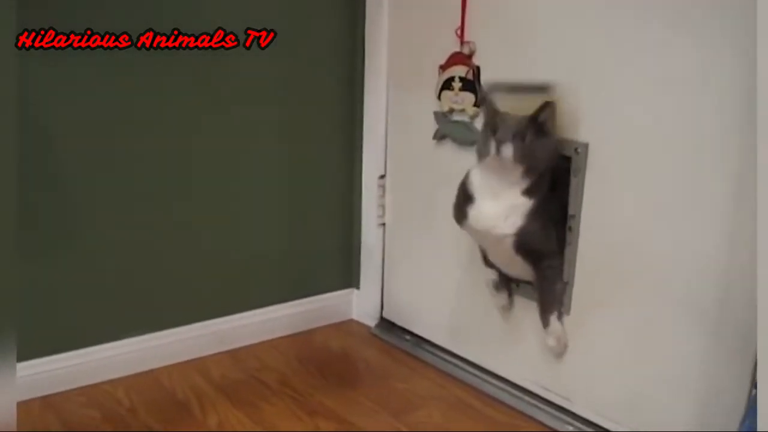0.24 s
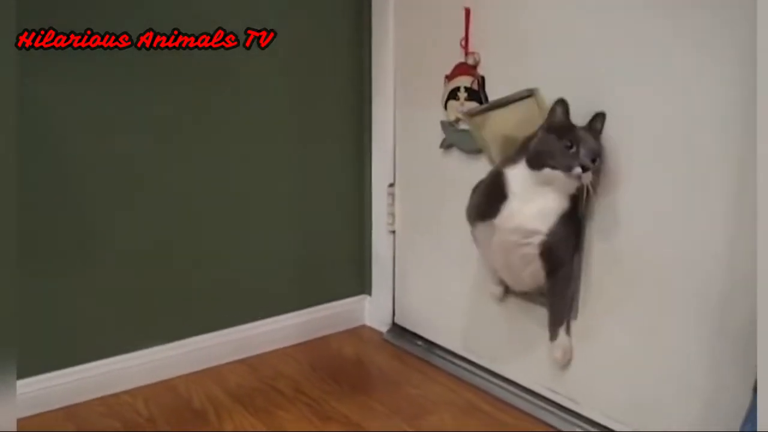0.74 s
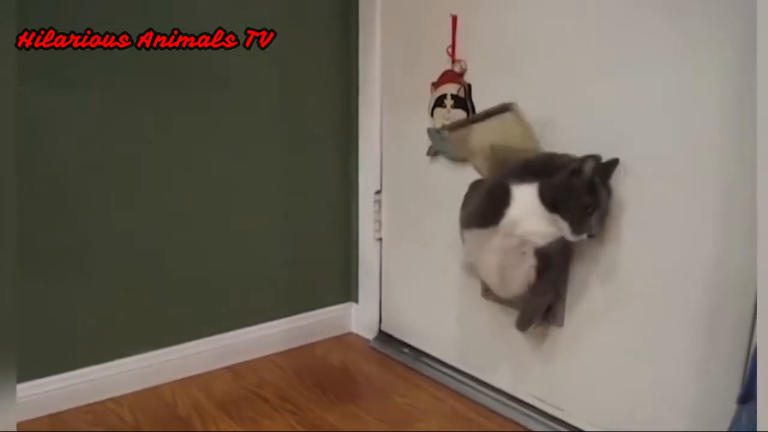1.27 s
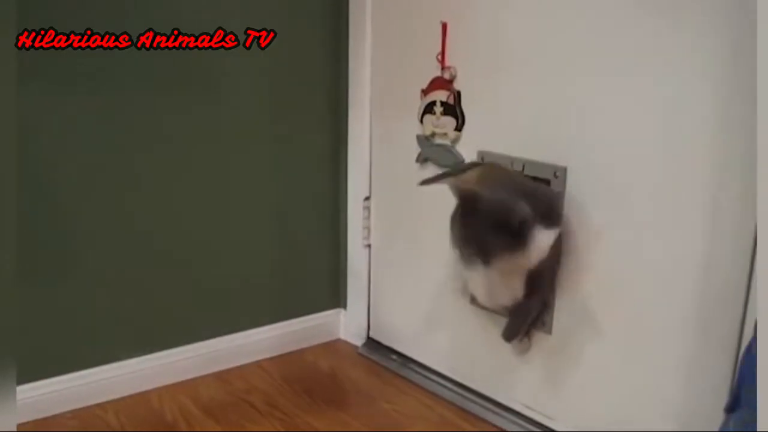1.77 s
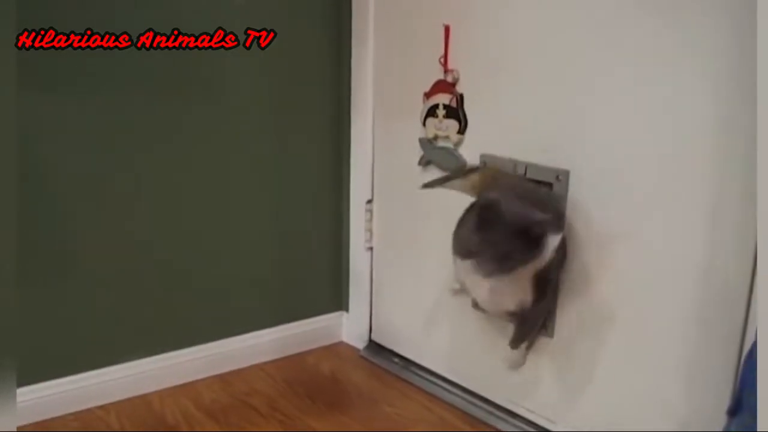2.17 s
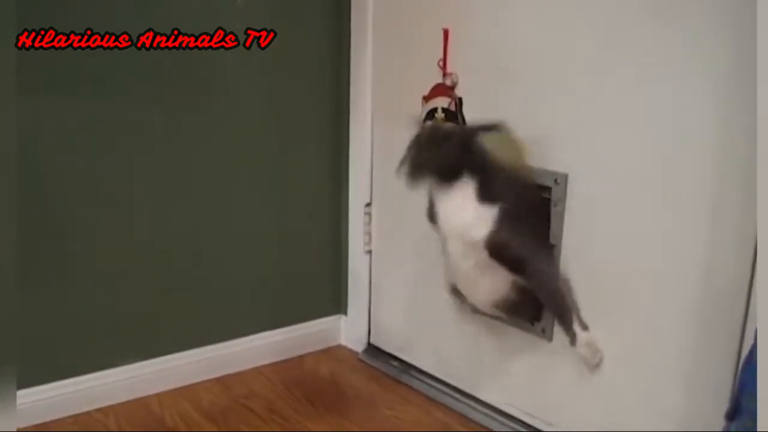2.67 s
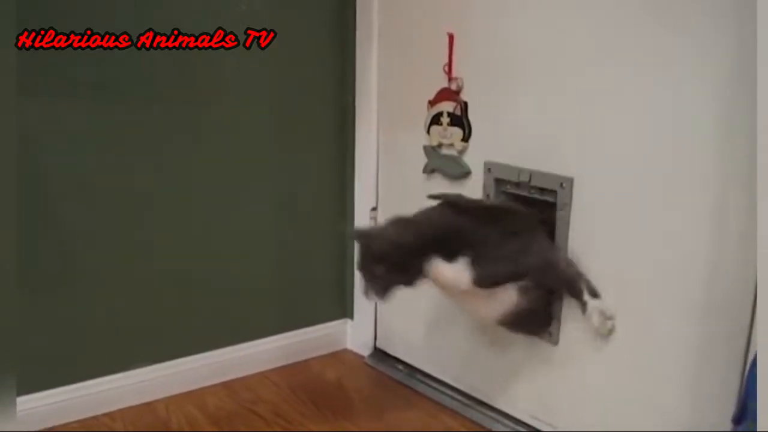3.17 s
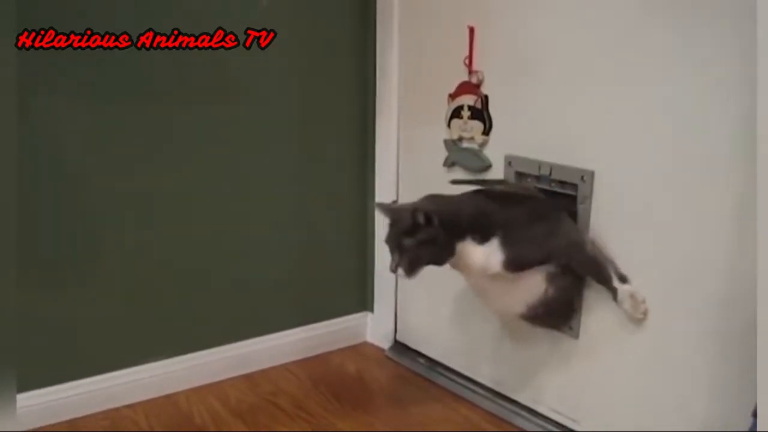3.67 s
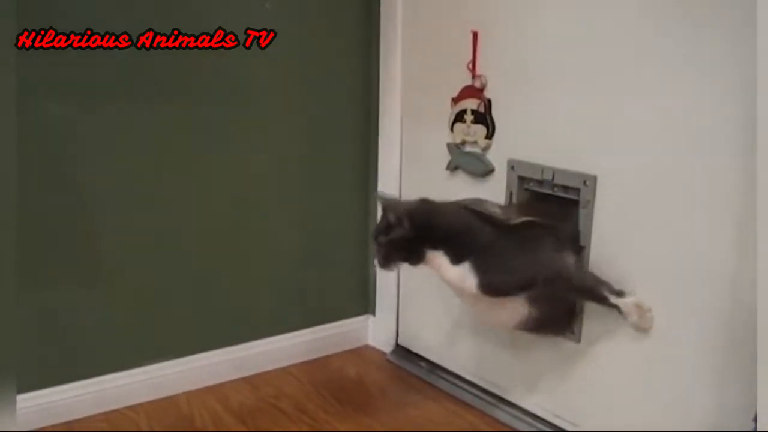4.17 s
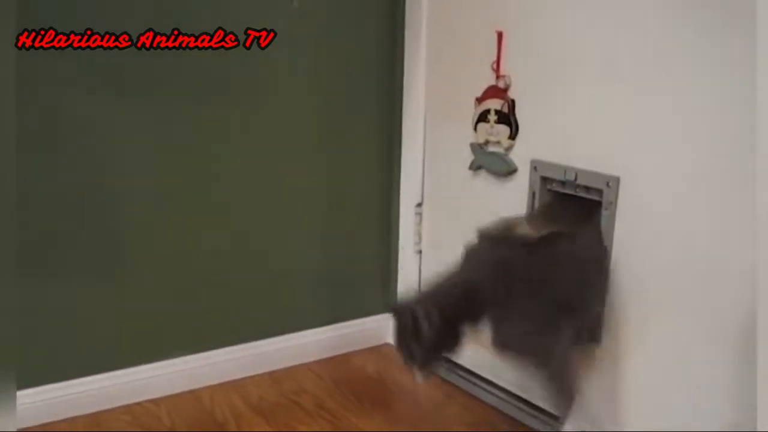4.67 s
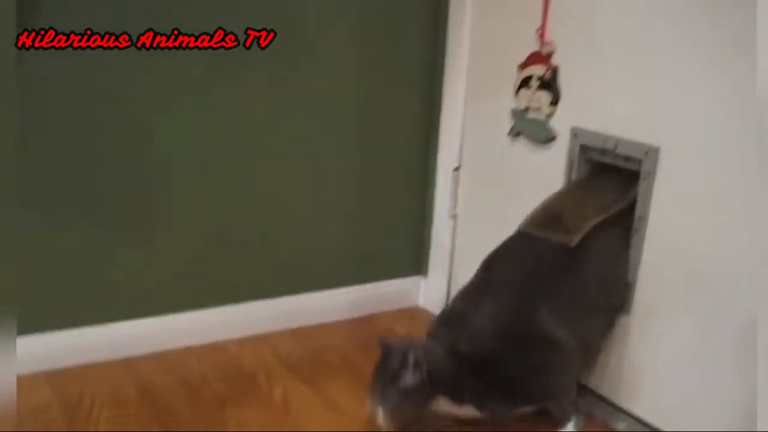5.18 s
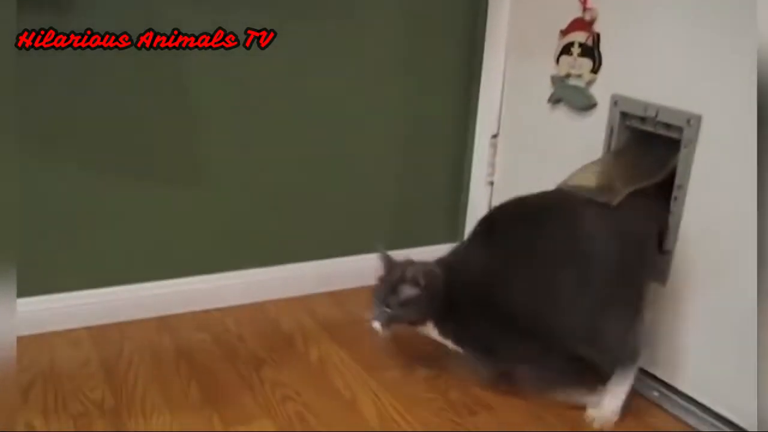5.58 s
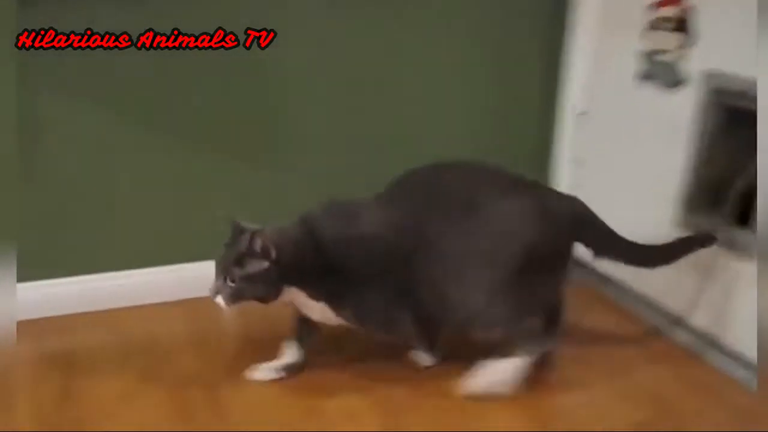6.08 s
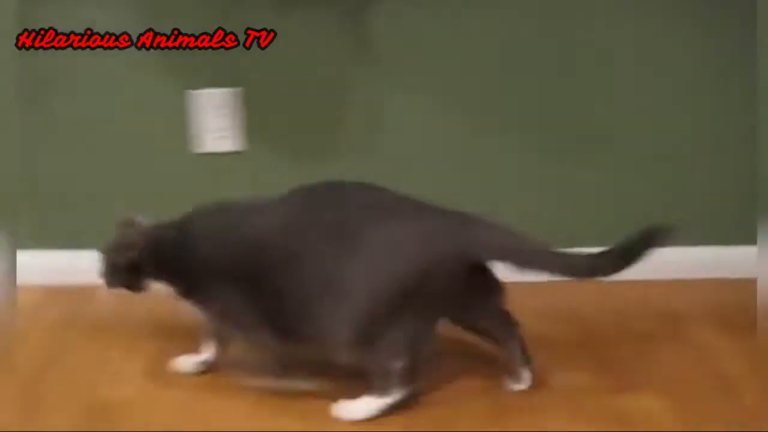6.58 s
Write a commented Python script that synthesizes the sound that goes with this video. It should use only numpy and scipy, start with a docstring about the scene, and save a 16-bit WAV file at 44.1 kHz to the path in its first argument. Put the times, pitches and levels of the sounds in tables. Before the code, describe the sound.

Close mono indoor sound of plastic pet door parts rattling as a big animal wriggles through. Small creaking ticks and dull body bumps open it, followed by scattered clacks, a loud double slap, dense shifting clatter with short scrapes, and low panel wobbles. After a sharp snap and a pair of loose knocks, the rattling stops; soft paws thump and claws click on a wooden floor in faint room air.

```python
"""A soft rub, a hiss and a low rumble begin, then plastic ticks and knocks as a heavy cat squeezes
through a pet door set in a hollow house door, in a small hard room. Rubs, scrapes and ticks are made of
tiny random slips; knocks are short bursts of contacts that ring the door's parts. The door panel sways
in slow, wavering swings. At the end soft paws land, a last knock has a sharp, bright top, and claws
tick on the wooden floor."""
import sys
import numpy as np
from scipy import signal
from scipy.fft import rfft, irfft
from scipy.io import wavfile

SR = 44100
rng = np.random.default_rng(int(sys.argv[2]) if len(sys.argv) > 2 else 0)


def output_pcm(signal):
    """Save a mono or channel-first signal as 16-bit PCM at the path in sys.argv[1].

    Samples are clipped to [-1, 1] before scaling.
    """
    pcm = np.clip(np.atleast_2d(signal).T, -1, 1) * 32767
    wavfile.write(sys.argv[1], SR, np.round(pcm).astype(np.int16))


N = 301189  # length of the scene in samples

# The faint, still air of the room. Each row: frequency in Hz, relative level in dB.
AIR_COLOUR = [(12, -24), (20, -23.5), (60, -9), (130, -8), (328, 6.5), (678, -6), (1290, 0), (2020, -8),
              (3950, -12), (11800, -22), (16000, -28)]
AIR_DB = -54.5  # average (rms) level

# How hard the body drags through the opening.
# Each row: time in seconds, relative level of the cloth-like rub in dB, relative level of the fur hiss in dB.
DRAG_LEVELS = [(0.0, -43, -45.5), (0.25, -48.5, -47), (0.61, -45, -47), (0.84, -50.5, -55.5),
               (1.05, -57, -62), (1.22, -58, -50), (1.41, -51, -59), (1.56, -54, -52), (1.94, -52.5, -50.5),
               (2.15, -59, -60), (2.41, -47.5, -50.5), (2.78, -44.5, -48), (3.01, -52, -52),
               (3.23, -45.5, -59), (3.5, -39.5, -38.5), (3.71, -46, -61), (3.94, -42.5, -45.5),
               (4.13, -44, -46), (4.39, -41, -46.5), (4.62, -44.5, -46), (4.81, -57, -53.5),
               (5.19, -46, -47.5), (5.5, -57.5, -56), (5.95, -50.5, -57.5), (6.24, -61, -64),
               (6.83, -52, -56.5)]
# The rub's spectrum. Each row: frequency in Hz, relative level in dB.
RUB_SPECTRUM = [(100, 1), (160, 4.5), (230, -4), (400, -1.5), (620, -4.5), (850, 1.5), (1300, -3),
                (2200, -42), (4000, -9.5), (16000, -89.5)]
# The fur hiss's spectrum. Each row: frequency in Hz, relative level in dB.
FUR_SPECTRUM = [(600, 6.5), (1500, 11.5), (2500, 11.5), (4300, 3.5), (6000, 0), (10000, -9.5), (16000, -35)]
# How strong the low rumble is. Each row: time in seconds, relative level in dB.
RUMBLE_LEVELS = [(0, -47), (1.1, -46.5), (2.2, -50.5), (2.7, -45), (3.2, -46.5), (3.6, -40.5), (4.0, -54),
                 (4.5, -44.5), (6.0, -59)]
# The rumble's spectrum. Each row: frequency in Hz, relative level in dB.
RUMBLE_SPECTRUM = [(10, -3), (30, 7), (55, 1.5), (70, -1.5), (90, 2), (120, -13), (200, -25), (600, -64)]

# The strained frame creaks in runs of stick and slip.
# Each row: start in seconds, length in seconds, usual time between slips in seconds, relative level in dB.
CREAK_RUNS = [(.0084, .044, 0.0081, -30.5), (0.1534, .005, .02, -32), (0.172, 0.074, .018, -27),
              (0.2675, .005, .02, -28.5), (.392, .018, 0.01155, -31), (0.478, .015, 0.009, -34.5),
              (.5526, .035, .0234, -29.5), (.707, .005, .02, -34), (3.907, .055, 0.035, -34.5)]
# The spectrum of a tick. Each row: frequency in Hz, relative level in dB.
TICK_SPECTRUM = [(500, -39), (3000, -14.5), (3700, 1.5), (4300, 1.5), (5200, -11), (7500, -14.5),
                 (8700, -13.5), (10000, -13), (11500, -23), (16000, -35)]
SLIP_JITTER, SLIP_SPREAD_DB = 0.06, 1  # slips come unevenly: share of the gap, and level
RELAX_DB_PER_S = 34  # slips weaken as the strain is let out
CRACKLE_DB = -14  # smaller slips, this much weaker, fall anywhere in a run

# Blows on the door. The chest and one foreleg push through; from 1 s the cat twists from side to side
# under the flap; from 2.5 s the shoulders come free; from 3.1 s the belly sticks and the cat heaves;
# from 4.6 s belly and hips slip out, and the flap drops.
# Each row: time in seconds, part struck, relative strength in dB, extra weight in the bass in dB,
# extra hardness in the treble in dB, chatter length in seconds before stretching.
DOOR_KNOCKS = [ (0.075, "panel", -34, 4, 10.5, 0.0032), (.3365, "frame", -36.5, 4.5, 2, 0.0074),
               (.353, "panel", -23.5, -9, -10, 0.0028), (0.617, "edge", -36.5, 2.5, 13, .0038),
               (0.665, "hinge", -42.5, 1, -2, 0.0037), (0.726, "panel", -32.5, -6, -19, 0.0098),
               (0.805, "sill", -35.5, -2, -7, 0.0059), (1.041, "hinge", -38.5, 4, 3, 0.0071),
               (1.05, "flap", -32, 0, -14, 0.00747), (1.175, "frame", -34.5, -2, -8, 0.0047),
               (1.183, "flap", -29, -7.5, -1, 0.01), (1.267, "frame", -39.5, 1, -1.5, 0.0073),
               (1.4076, "edge", -21, -14.5, -5, 0.0037), (1.414, "edge", -31, 7.5, -16, 0.0048),
               (1.764, "frame", -50, 12, 0, 0.0084), (1.868, "seat", -28.5, 3.5, -21.5, 0.013),
               (1.888, "seat", -28.5, -7, -4, .012), (1.942, "edge", -28.5, 7, 15, 0.0062),
               (1.949, "flap", -18, -6, -27, 0.0045), (2.536, "edge", -27.5, 4, 21, 0.0042),
               (2.539, "flap", -18.5, 3, -2, 0.0055), (2.684, "frame", -34, 8, -3, 0.0039),
               (2.794, "seat", -32.5, -2.5, -2, .006), (2.841, "seat", -32.5, 0.5, -3.5, 0.00988),
               (2.876, "frame", -48, -5, 12, 0.013), (2.903, "seat", -28.5, -1.5, 1.5, 0.015),
               (2.989, "edge", -34, -12, -7.5, 0.0111), (3.074, "frame", -47, -4, -4, 0.0129),
               (3.163, "panel", -40.5, 1, 5, 0.014), (3.219, "panel", -35, 5.5, -4.5, .005),
               (3.284, "sill", -24, -6, 4, 0.0079), (3.323, "frame", -39.5, -8, -2.5, 0.0046),
               (3.377, "sill", -34, -5, 12, .0048), (3.421, "seat", -33, 0.5, 23, 0.00731),
               (3.428, "flap", -27, -3, -12, .004), (3.494, "seat", -33.5, -0.5, 2, 0.0077),
               (3.576, "edge", -39, 1, 6, 0.0046), (3.643, "seat", -37.5, -3, 12.5, 0.0042),
               (3.648, "hinge", -35.5, 4, 0.5, 0.0039), (3.992, "seat", -33, -4.5, -4, 0.0092),
               (4.161, "frame", -31, 1.5, 0, 0.00785), (4.202, "edge", -37.5, -2, 0, 0.0059),
               (4.265, "frame", -41, -1, 0, 0.0068), (4.326, "hinge", -47, -5, 1, 0.0025),
               (4.6022, "frame", -20.5, -16, -2.5, 0.0024), (4.797, "hinge", -44.5, -6.5, 5.5, .007),
               (4.975, "edge", -37, -5, -9.5, .011), (5.097, "hinge", -43, 3, -6, 0.0022),
               (5.114, "seat", -27, 0, -0.5, 0.01406), (5.124, "seat", -26, -4.5, 3, .009),
               (5.159, "sill", -30.5, -3, 3, 0.0039), (5.69, "seat", -30, -3.5, -14, 0.0068)]
# How each part sounds when struck. Panel: the body bumps the hollow door. Sill: a leg bumps the bottom of
# the opening. Seat: the whole pet door shifts in its cut-out. Flap: its face slaps. Edge: the flap's stiff
# edge catches. Hinge: the flap jumps in its pivots. Frame: the loose frame snaps.
# Each row: part name, then door panel level in dB, flap level in dB, frame level in dB, sharp crack level
# in dB, main ring in Hz, height of that ring in dB before its neighbourhood is lowered.
DOOR_PARTS = {"panel": (-0.5, -10, -11, -23, 308, 11), "sill": (2, -7.5, -11.5, -22.5, 420, 4),
              "seat": (-2.5, -2, -10, -22, 618, 4.5), "flap": (-14, 0.5, -4, -13, 748, 16),
              "edge": (-15.5, -1.5, -8.5, -19.5, 1282.5, 14), "hinge": (-4, -3, 1, -18.5, 2850, 10),
              "frame": (-9.5, -7.5, -1, -10, 4516, 14)}
# Where panel, flap, frame and crack speak. Each row: frequency in Hz.
PART_CENTRES = [300, 1000, 3500, 7500]
# Weight acts below the middle one, hardness above it. Each row: frequency in Hz.
TILT_CENTRES = [297, 941, 9400]
# The colour that every knock shares. Each row: frequency in Hz, relative level in dB.
DOOR_SPECTRUM = [(30, -33), (80, -1.5), (135, 2), (235, -7.5), (300, 0.5), (430, 0), (560, -3), (1150, -3),
                 (1700, -5.5), (2300, -5.5), (4400, -4), (5600, -7), (10000, -11.5), (12500, -21.5),
                 (16000, -24)]
# Narrow modes of panel and flap in every knock. Each row: frequency in Hz, height in dB (a dip if negative).
PANEL_FLAP_MODES = [(137, 6), (435, 3), (592, 4), (759, 6), (998, 2), (1156, 5.5), (1366, 0.5), (1726, 6),
                    (1900, 6), (2088, -9), (2377, 4)]

# The door panel sways when the cat heaves. Each row: start in seconds, level in dB, middle pitch in Hz.
PANEL_SWAYS = [(0.081, -38, 51), (0.333, -36.5, 79), (1.246, -35, 39.24), (2.451, -26, 55.4),
               (2.795, -40, 130), (3.216, -30, 86.7), (3.466, -24.5, 53), (3.623, -33.5, 60),
               (3.713, -31.5, 55.7), (4.39, -27.5, 60.46), (4.49, -33, 59), (5.11, -33.5, 132)]
SWAY_S = 0.0813  # each sway swells and dies in this time

# Fur and paws slide over plastic and floor. Each row: start in seconds, length in seconds,
# average level in dB before the swell, start pitch in Hz, end pitch in Hz, resonance width in Hz.
SLIDES = [(1.014, 0.041, -35.5, 1670, 1870, 3430), (1.575, .04, -39.5, 1800, 2250, 4060),
          (1.771, 0.0288, -45, 2780, 2800, 2000), (2.873, 0.098, -39.5, 1400, 1400, 3000),
          (2.963, 0.057, -36, 940, 1010, 1570), (3.564, 0.038, -32.5, 4300, 3840, 4500),
          (3.998, 0.079, -34.5, 1730, 2250, 3500), (4.009, 0.05, -31.5, 3260, 6000, 1940),
          (4.284, 0.053, -43, 5440, 4980, 1500), (4.495, 0.045, -42, 3680, 3930, 3000),
          (5, 0.065, -42, 1990, 2750, 3920), (5.318, .18, -50.5, 415, 494, 920),
          (6.446, 0.0073, -46, 1900, 1860, 1600)]

# Soft pads landing on the floor. Each row: time in seconds, relative level in dB.
PAW_LANDINGS = [(5.597, -54.5), (5.99, -38), (6.16, -37), (6.252, -29.5), (6.488, -32)]
# The spectrum of a pad. Each row: frequency in Hz, relative level in dB.
PAW_SPECTRUM = [(30, -14), (70, 6), (160, 4.5), (330, -2), (700, -22.5), (3000, -38), (16000, -62.5)]
# Bright, hard clicks: the first is the sharp top of the knock at 5.69 s, the others are claws touching
# the wooden floor. Each row: time in seconds, relative level in dB.
HARD_CLICKS = [(5.695, -28), (5.8022, -40), (5.9833, -43), (6.0404, -40), (6.0477, -36.5), (6.2801, -41),
               (6.54, -38), (6.548, -37), (6.6288, -45.5), (6.6977, -37), (6.8034, -45.5)]
# The spectrum of a hard click. Each row: frequency in Hz, relative level in dB.
CLICK_SPECTRUM = [(500, -6), (2200, -3.5), (3400, 8), (6500, 2), (9000, -9), (15000, -25)]

# How long the room rings. Each row: frequency in Hz, time to fall by 60 dB in seconds.
ROOM_DECAY = [(150, 0.48), (400, 0.3), (1000, 0.43), (2800, 0.39), (4500, 0.307), (7300, 0.37),
              (14000, 0.227)]
# Reflections from floor and near walls. Each row: usual delay in seconds, relative gain.
NEAR_ECHOES = [(.0046, 0.5), (.0088, 0.18), (0.0106, -0.049), (0.015, 0.18)]
WALL_HZ = 8600  # the walls absorb above this
TAIL_DB = -1  # level of the diffuse tail, added to each sound's own setting
EDGE_HZ = 16000  # the sound ends above this


def amp(db):
    """Turns decibels into gain."""
    return 10 ** (np.asarray(db) / 20)


def evened(x):
    """Scales a sound to an average (rms) level of 1."""
    return x / np.sqrt(np.mean(x ** 2) + 1e-20)


def seconds(length):
    """Makes a time axis of this length."""
    return np.arange(int(length * SR)) / SR


def dying(t, t60):
    """A decay that loses 60 dB in t60 seconds."""
    return np.exp(-np.log(1000) * t / np.maximum(t60, 1e-4))


def read(points, hz):
    """Joins the points of a spectrum on a log-frequency axis."""
    f, value = np.transpose(points)
    return np.interp(np.log(hz + 1), np.log(f + 1), value)


def add(mix, start, sound):
    """Mixes a sound in at its start time, in seconds."""
    part = mix[max(round(start * SR), 0):][:len(sound)]
    part += sound[:len(part)]


def coloured(x, points):
    """Gives a sound a spectrum, at rms 1."""
    gain = amp(read(points, np.fft.rfftfreq(len(x), 1 / SR)))
    return evened(irfft(rfft(x) * gain, len(x)))


def band(x, low_hz, high_hz, order=3):
    """Keeps only the sound between two frequencies."""
    edges = [low_hz, min(high_hz, SR / 2 - 100)]
    return signal.sosfilt(signal.butter(order, edges, "band", fs=SR, output="sos"), x)


def grains(size, per_s, spread_db):
    """Tiny slips of uneven strength at random moments."""
    strength = rng.standard_normal(size)
    happens = rng.random(size) < per_s / SR
    uneven = amp(spread_db * rng.standard_normal(size))
    return evened(strength * happens * uneven)


def peak(hz, centre_hz, width_hz, height_db):
    """One resonance standing out of a flat spectrum, in dB."""
    distance = 2 * (hz - centre_hz) / width_hz
    return 10 * np.log10(1 + (amp(height_db) ** 2 - 1) / (1 + distance ** 2))


def spot(hz, spread_db, count=48):
    """Each point of contact favours some resonances and misses others, in dB."""
    heights = rng.standard_normal(count)
    uneven = np.interp(np.sqrt(hz / hz[-1]), np.linspace(0, 1, count), heights)
    return spread_db * uneven * hz / (hz + 1200)  # mostly in the treble


def ripple(hz, depth_db=2.0, width_hz=170, from_hz=900):
    """Each blow wakes its own mix of the plastic's many upper modes, in dB."""
    heights = rng.standard_normal(256)
    uneven = np.interp(hz / width_hz, np.arange(len(heights)), heights)
    return depth_db * uneven * hz / (hz + from_hz)


def struck(gain_db):
    """How a damped body with this spectrum answers a blow: nothing sounds before it is hit."""
    log_gain = np.log(amp(np.concatenate([gain_db, gain_db[-2:0:-1]])))
    causal = np.exp(np.conj(signal.hilbert(log_gain)))  # minimum phase
    return irfft(causal[:len(gain_db)])


def chatter(length, first, rounds=6, bite=0.15, lumpy_db=4):
    """A burst of tiny contacts that bites and dies, of unit energy and with no pitch of its own."""
    t = seconds(0.06)
    length = np.clip(length, 0.0003, 0.02)
    rise = 1 - (1 - first) * np.exp(-t / (bite * length))  # starts at the share "first"
    fade = np.exp(-t / length) * rise
    clump_times = t[::48]
    fade *= amp(lumpy_db * np.interp(t, clump_times, rng.standard_normal(len(clump_times))))
    burst = rng.standard_normal(len(t)) * fade
    for _ in range(rounds):  # even out the spectrum while keeping the burst short
        flat = irfft(np.exp(1j * np.angle(rfft(burst))), len(t))
        burst = flat * np.minimum(2 * fade, 1)
    return burst / np.linalg.norm(burst)


def room(x, wet_db, early_db, build_s=0.00067):
    """A few near reflections, then a diffuse tail that dies at its own rate at each pitch."""
    hz, t, z = signal.stft(rng.standard_normal(SR // 2), SR, nperseg=256)
    z = z / np.sqrt(1 + (hz[:, None] / WALL_HZ) ** 2)  # the walls return less treble
    fading = z * dying(t, read(ROOM_DECAY, hz)[:, None])
    tail = signal.istft(fading, SR, nperseg=256)[1]
    tail *= 1 - np.exp(-(np.arange(len(tail)) / SR / build_s) ** 2)  # the tail builds up
    tail *= amp(wet_db + TAIL_DB) / np.linalg.norm(tail)
    for delay, gain in NEAR_ECHOES:
        varied_delay = delay * rng.uniform(0.9, 1.1)
        tail[int(varied_delay * SR)] += gain * amp(early_db)
    tail[0] += 1  # the direct sound
    return signal.fftconvolve(x, tail)


def taps(rows, colour, length, wet_db, early_db, gain_db, spot_db=3):
    """Small single contacts of one kind, each coloured by where it lands."""
    out, hz = np.zeros(N), np.fft.rfftfreq(4096, 1 / SR)
    for start, db in rows:
        body = struck(read(colour, hz) + spot(hz, spot_db))
        tap = signal.fftconvolve(chatter(length, first=1), body)
        tap /= abs(tap).max()
        add(out, start + 0.001044, amp(db + gain_db) * room(tap, wet_db, early_db))
    return out


def still_air():
    """The quiet room: steady random noise with a soft spectrum."""
    return amp(AIR_DB) * coloured(rng.standard_normal(N), AIR_COLOUR)


def rubbing(rub_db=-2, fur_db=-2, rumble_db=1, patchy_db=2):
    """The body drags through the frame in small uneven pushes; many tiny slips rub and hiss over a rumble."""
    times, *levels = np.transpose(DRAG_LEVELS)
    t = np.arange(N) / SR
    rub_level, fur_level = (np.interp(t, times, level) for level in levels)
    rumble_level = np.interp(t, *np.transpose(RUMBLE_LEVELS))
    pushes_db = patchy_db * np.interp(t, np.linspace(0, t[-1], 300), rng.standard_normal(300))
    rub = amp(rub_level + rub_db + pushes_db) * coloured(grains(N, 2500, 0.74), RUB_SPECTRUM)
    hiss = amp(fur_level + fur_db + pushes_db) * coloured(grains(N, 3000, 1.3), FUR_SPECTRUM)
    rumble = amp(rumble_level + rumble_db) * coloured(rng.standard_normal(N), RUMBLE_SPECTRUM)
    return rub + hiss + rumble


def ticks(count=12):
    """The frame creaks in runs of slips, with finer crackle between; they ring only its small, stiff parts."""
    slips = []
    for start, length, gap, db in CREAK_RUNS:
        early_or_late, uneven = rng.standard_normal((2, count))
        waits = gap * (1 + SLIP_JITTER * early_or_late)
        t = np.cumsum(waits) - waits[0]  # the first slip comes at once
        levels_db = db - RELAX_DB_PER_S * t + SLIP_SPREAD_DB * uneven
        levels_db = levels_db[t < length]  # keep only slips inside the run
        slips += list(zip(start + t, levels_db))
        crackle_times = start + length * rng.random(count)
        slips += list(zip(crackle_times, levels_db + CRACKLE_DB))
    return taps(slips, TICK_SPECTRUM, length=0.00105, wet_db=-6.5, early_db=-3.5, gain_db=5)


def knocks(gain_db=42.0, ring_width=0.15, mode_width_hz=30, split_hz=2400, slow=1.54, fast=0.794,
           lag=0.1928, first=0.377, wet_db=-4, early_db=-2):
    """Plastic chatters on plastic: treble is over at once, the bending flap and panel follow and take longer."""
    out, hz = np.zeros(N), np.fft.rfftfreq(4096, 1 / SR)
    low_share = 1 / (1 + (hz / split_hz) ** 4)
    modes_db = sum(peak(hz, f, mode_width_hz, db) for f, db in PANEL_FLAP_MODES)
    door_db = read(DOOR_SPECTRUM, hz) + modes_db
    for start, part, db, weight_db, hardness_db, length in DOOR_KNOCKS:
        *levels_db, ring_hz, ring_db = DOOR_PARTS[part]
        colour_db = door_db + read(list(zip(PART_CENTRES, levels_db)), hz)
        colour_db += peak(hz, ring_hz, ring_width * ring_hz, ring_db)
        # the ring draws on its neighbours
        colour_db -= ring_db / 2 * np.exp(-2 * np.log((hz + 1) / ring_hz) ** 2)
        tilt_db = read(list(zip(TILT_CENTRES, [weight_db, 0, hardness_db])), hz)
        colour_db += db + tilt_db + ripple(hz)
        knock = np.zeros(SR // 5)
        for share, stretch, delay in [(low_share, slow, lag * length), (1 - low_share, fast, 0)]:
            contacts = chatter(length * stretch, first)
            body = struck(colour_db + 10 * np.log10(share + 1e-6))
            add(knock, delay, signal.fftconvolve(contacts, body))
        add(out, start, amp(gain_db) * room(knock, wet_db, early_db))
    return out


def sways(waver=0.32):
    """Slow, uneven swings of the whole panel: low tones whose pitch wavers."""
    out, t = np.zeros(N), seconds(SWAY_S)
    for start, db, hz in PANEL_SWAYS:
        drift = np.interp(t, np.linspace(0, SWAY_S, 6), rng.standard_normal(6))
        speed_hz = hz * (1 + waver * drift)
        swing = np.sin(2 * np.pi * np.cumsum(speed_hz) / SR)
        add(out, start, amp(db) * swing * signal.windows.tukey(len(t), 0.7))
    return out


def scrapes(swell=0.95):
    """Dense slips through a broad resonance that follows the sliding speed; each swells, then lets go."""
    out = np.zeros(N)
    for start, length, db, start_hz, end_hz, width_hz in SLIDES:
        t = seconds(length)
        pitch_hz = np.linspace(start_hz, end_hz, len(t))
        turn = np.exp(2j * np.pi * np.cumsum(pitch_hz) / SR)
        r = np.exp(-np.pi * width_hz / SR)
        # turn the slips down to 0 Hz, smooth them there, and turn them back up to the moving pitch
        smooth = signal.lfilter([1], np.poly([r, r]), grains(len(t), 7000, 1) / turn)
        slide = evened(band((turn * smooth).real, 200, 6020, order=2))
        add(out, start, amp(db) * slide * np.sin(np.pi * (t / length) ** swell))
    return out


def paw_pads():
    """Soft pads land on the floor: brief, dull contacts."""
    return taps(PAW_LANDINGS, PAW_SPECTRUM, length=0.0022, wet_db=-5.5, early_db=-16, gain_db=-7.0)


def hard_clicks():
    """Brief, bright contacts: first the sharp top of the knock at 5.69 s, then claws on the floor."""
    return taps(HARD_CLICKS, CLICK_SPECTRUM, length=0.0035, wet_db=-8, early_db=-1, gain_db=4.5)


def scene():
    """The pet door, the cat and the still air of the room, in one channel."""
    sliding = room(scrapes(), wet_db=-6.5, early_db=-1)[:N]
    mix = still_air() + rubbing() + ticks() + knocks() + sways() + sliding + paw_pads() + hard_clicks()
    return mix[None]


def record(dry):
    """Takes away the highest treble with a steep low-pass filter."""
    low_pass = signal.firwin(511, EDGE_HZ, window=("kaiser", 9), fs=SR)
    return signal.oaconvolve(dry, low_pass[None], "same")


dry = scene()
out = record(dry)
output_pcm(out)
```